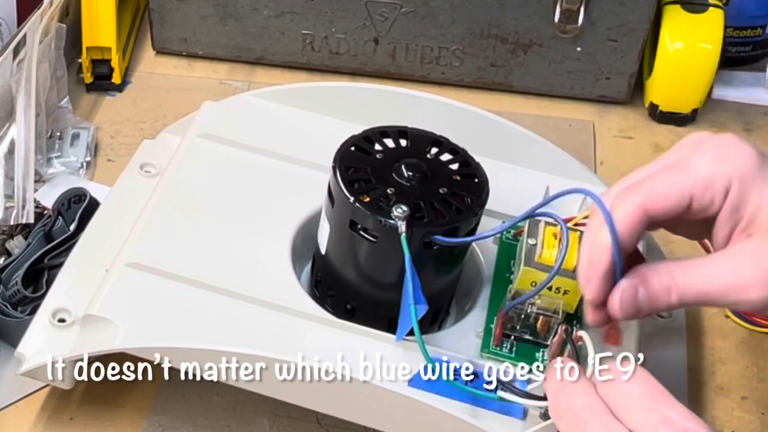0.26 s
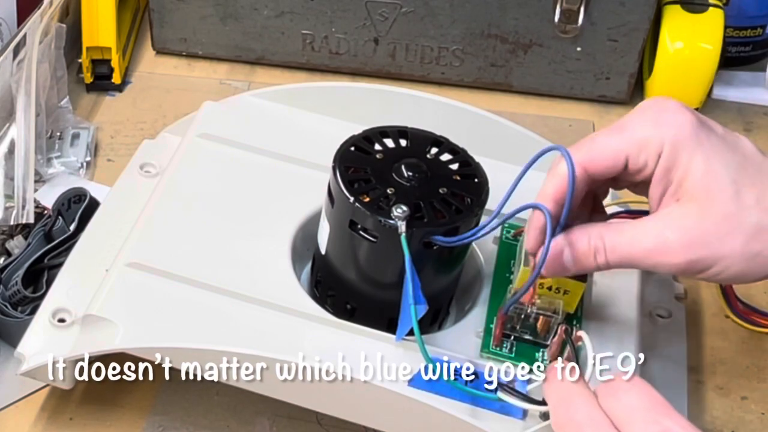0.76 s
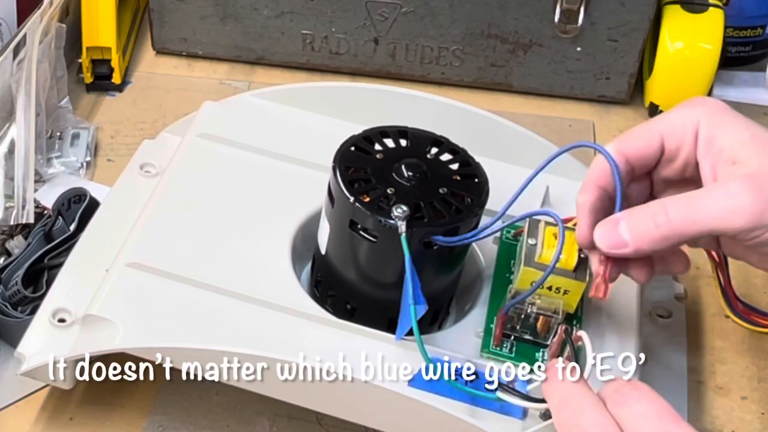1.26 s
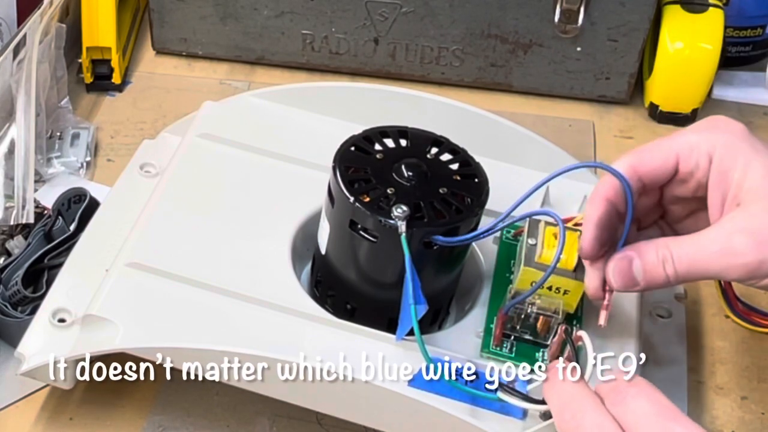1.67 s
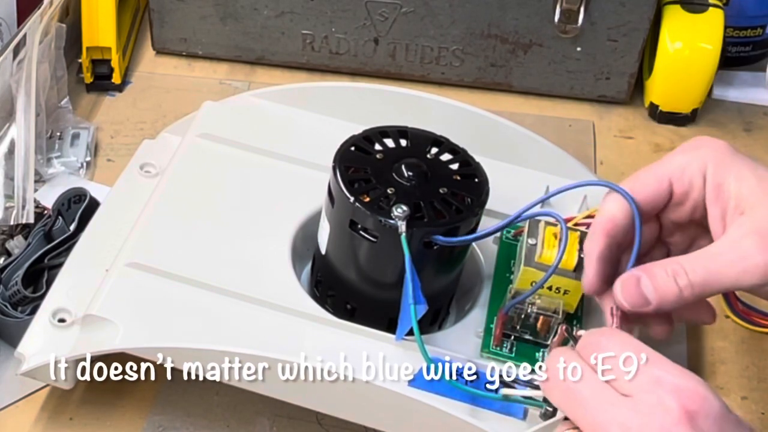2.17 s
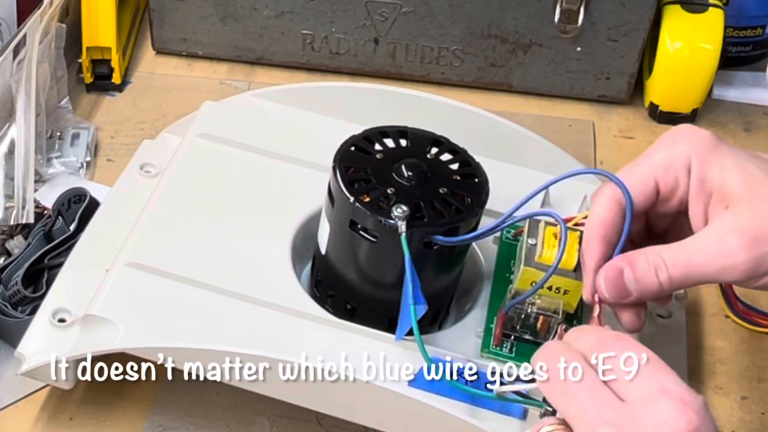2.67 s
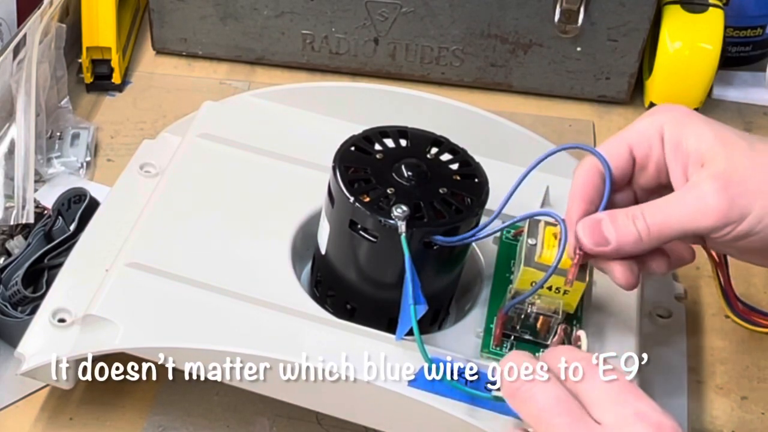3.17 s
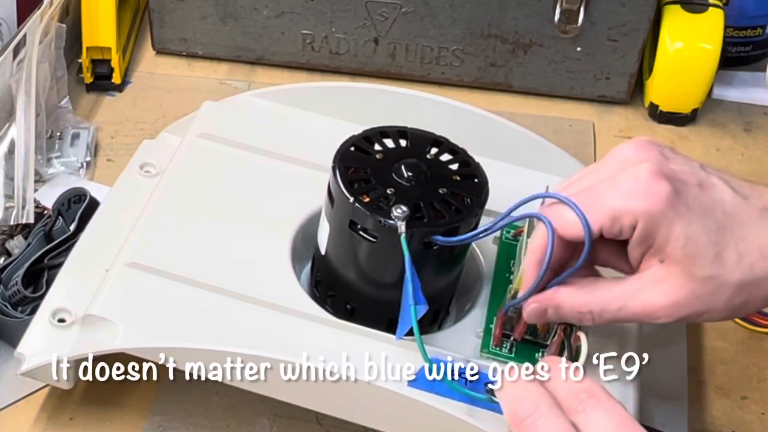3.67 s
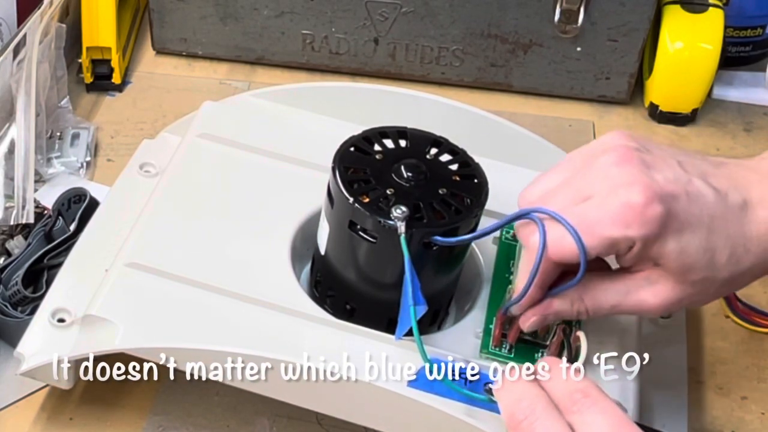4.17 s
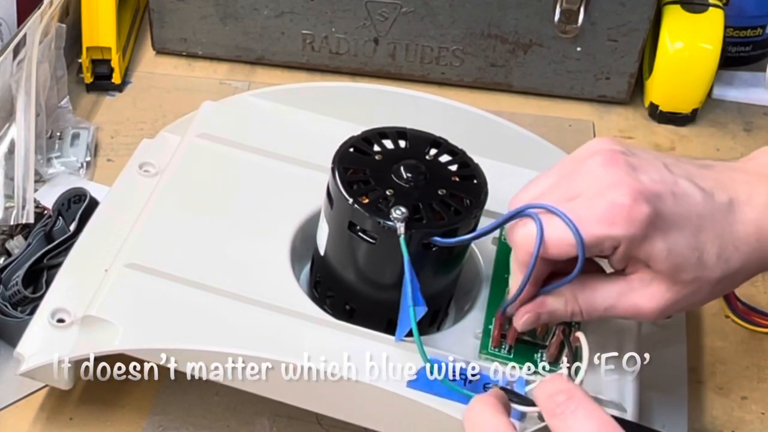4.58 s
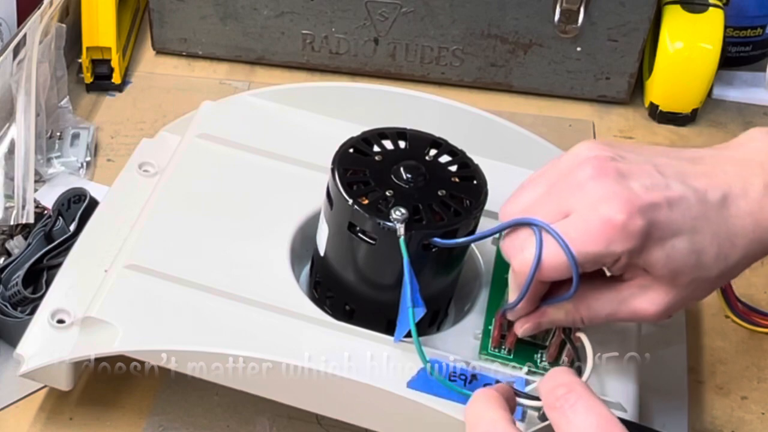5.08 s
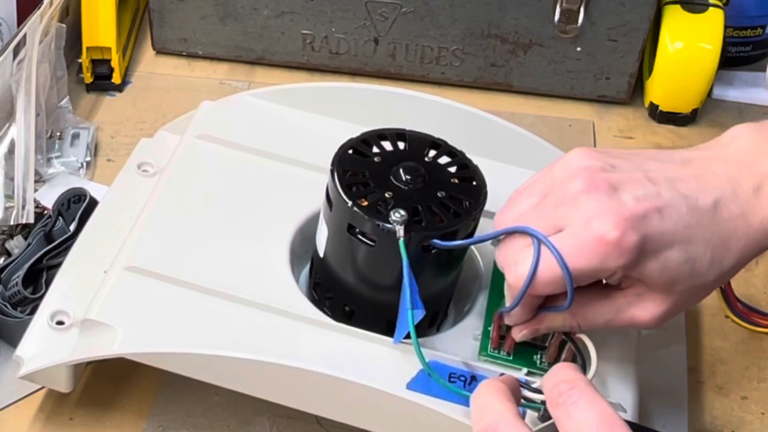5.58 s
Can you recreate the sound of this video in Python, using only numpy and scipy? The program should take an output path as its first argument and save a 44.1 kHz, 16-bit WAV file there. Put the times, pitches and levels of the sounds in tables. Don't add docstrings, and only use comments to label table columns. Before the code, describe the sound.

Close, dry clicks and short rubs of fingers fitting wire connectors to a circuit board on a hollow plastic housing. A burst in the first second, a nearly quiet middle, then busier pushing with firm knocks and a sharp final snap. Low ventilation hum throughout; stereo phone about half a metre away in a small workshop.

```python
import sys
import numpy as np
from scipy import signal
from scipy.fft import rfft, irfft
from scipy.io import wavfile
from scipy.ndimage import uniform_filter1d

SR = 44100
rng = np.random.default_rng(int(sys.argv[2]) if len(sys.argv) > 2 else 0)


def elevation(decibels):
    levels = np.asarray(decibels, float)
    return 10 ** (levels / 20)


def transcribe(signal):
    frames = np.atleast_2d(signal).T
    limited = np.clip(frames, -1, 1)
    pcm = np.round(limited * 32767).astype(np.int16)
    wavfile.write(sys.argv[1], SR, pcm)


N = 257103

# pitch_hz, density_db (per Hz)
ROOM_SPECTRUM = [(18, -49), (30, -12.5), (50, -3), (108, 0.5), (177, -14.5), (400, -19), (600, -26.5),
                 (1300, -37.5), (3700, -48), (6300, -39), (8800, -45.5), (10100, -36), (11400, -45.5),
                 (12600, -57)]
# pitch_hz, width_hz, level_db (rms)
FAN_TONES = [(435, 8.9, -70.5), (714, 11, -82.5), (1020, 45, -81.5), (2038, 14.5, -88.5), (5426, 48, -92),
             (6500, 300, -84)]
QUIET_DB = [-79, -81, -77, -87, -76]
# pitch_hz, near_likeness (0-1), room_likeness (0-1), lead_rad, left_minus_right_db
PORTS = [(0, 1, 1, 0, 1), (130, .97, .9, 0, 3.5), (300, .7, .25, -.4, -2), (700, .9, .3, -1.1, 1),
         (1600, .6, .3, -1.9, 2), (2300, .6, .3, -2.8, 1), (3400, .7, .25, -1.3, 5), (4300, .7, .3, 0, 1),
         (5800, .6, .2, 2.8, 4), (6800, .6, .25, 4, -1), (8300, .6, .2, 6, 0), (8750, .98, .65, 6.3, 1),
         (10250, .93, .95, 9.42, 0), (11700, .99, .98, 12.57, 1), (13000, .98, .95, 15, 1)]

# pitch_hz, level_db, t60_s
HOUSING_MODES = [(582.5, 2, 0.071), (605, -3.5, 0.061), (548, -27.5, 0.061), (417, -7.5, 0.04)]
RIM_MODES = [(759.4, 0, 0.11), (720, -2, 0.14), (841, -6.5, 0.058), (992, -0.5, 0.065), (1065, -6.5, 0.035),
             (1083, -5, 0.047)]
BOARD_MODES = [(1310, -2.5, 0.062), (1501, -11.5, 0.041), (1783, -1.5, 0.06), (1897, 1, 0.054),
               (2234, -8.5, 0.027)]
PARTS_MODES = [(2662, 2, 0.033), (2957, -1, 0.034), (3270, 1, 0.037), (3593, -3, 0.036),
               (3973, -8.5, 0.028), (4570, -5, 0.026)]
TAB_MODES = [(5460, 0, 0.022), (6100, 4, 0.025), (6560, 0, 0.034), (7260, -25, 0.018), (8240, -3.5, 0.02),
             (9080, -1.5, 0.012), (10130, 10.5, 0.011), (11040, 5.5, 0.014), (12500, -19, 0.014)]
# pitch_hz, level_db
BENCH_MODES = [(55, -14), (108, -1), (196, -12.5)]

# start_s, pitch_hz, level_db
SQUEAK = [
    (4.34, 6100, -95),
    (4.4, 6300, -71),
    (4.5, 6600, -78),
    (4.62, 6950, -78),
    (4.65, 6500, -95),
]
# start_s, length_s, housing_pressure_db, skin_hiss_over_it_db
SLIDES = [(.26, .08, -77, -7), (0.338, 0.087, -64.5, -19), (0.408, 0.099, -60, -15),
          (0.537, 0.063, -53, -36), (.628, 0.18, -74, -17), (1.63, 0.22, -80.5, -2.5), (1.767, .1, -83, 0),
          (2.618, .092, -67, -17), (2.802, 0.087, -93.5, 14), (2.907, 0.11, -62, -17.5),
          (3.01, 0.12, -70.5, -9), (0.993, 0.13, -88, -1), (3.426, 0.09, -74, -13),
          (3.472, .16, -63.5, -15), (3.624, 0.053, -54, -18.5), (3.701, 0.04, -54, -14),
          (3.97, 0.082, -63, -19.5), (4.148, 0.098, -61, -15), (4.27, 0.061, -68.5, 5.5),
          (4.336, 0.097, -64, -15), (4.444, 0.14, -66.5, -17.5), (4.625, 0.042, -72, 7.5),
          (4.707, .076, -60, -24), (4.802, 0.091, -73.5, -16), (4.957, 0.069, -66.5, -33),
          (5.225, 0.05, -55, -17), (5.338, 0.1, -66.5, -15), (5.471, 0.038, -60.5, -12),
          (5.526, 0.078, -71.5, -10)]
# start_s, length_s, pressure_db
DRAGS = [
    (3.03, 0.13, -76),
    (3.15, 0.3, -75.5),
    (4.38, 0.18, -82.5),
    (5.672, 0.043, -69),
    (5.722, .11, -63),
]
DRAG_DB = [4, -0.5, -0.5, -5, -2.5]
# start_s, pitch_hz, peak_db
RINGS = [(.445, 1070, -47), (.445, 1790, -45), (.535, 1320, -47), (.535, 1880, -49.5), (.537, 762, -41),
         (.54, 8800, -65), (2.215, 1770, -67.5), (2.49, 6100, -61), (.537, 1080, -47), (3.608, 1847, -41),
         (3.63, 192, -49), (4.175, 5200, -56), (4.186, 3800, -53), (4.201, 73.6, -54), (4.291, 199, -45.5),
         (4.294, 5700, -53.5), (4.659, 770, -30.5), (4.659, 1290, -42), (4.659, 1800, -41),
         (4.659, 3640, -43.5), (4.696, 6870, -50.5), (5.213, 1026, -42.5), (5.218, 190, -50.5),
         (5.269, 1050, -56), (5.496, 588, -34.5), (5.509, 8950, -29), (5.509, 9970, -26),
         (5.508, 11630, -24.5), (5.51, 1833, -34)]
# start_s, level_db
THUMPS = [
    (3.612, -38.5),
    (4.664, -29.5),
    (4.697, -34),
    (5.506, -32),
]
# start_s, board_db, housing_over_board_db, tab_over_board_db
PUSHES = [(.421, -45.5, -15, -29), (.4445, -37, -32, -14), (.4693, -48.5, -3, -13),
          (.5339, -41, -10.5, -12), (.5842, -58.5, 11, -16), (2.4846, -72.5, 0, 23.5),
          (2.9582, -49.5, -4.5, -7.5), (3.4122, -54, -1, -28), (3.6073, -35, -2.5, -16.5),
          (3.6566, -38, -9, -9.5), (3.7073, -53.5, 6.5, -2), (3.7153, -56, 8, 2), (3.7288, -54.5, -1, 2),
          (3.7444, -60, 12.5, -8), (4.1744, -49.5, -16, -18), (4.1844, -39, -12.5, -22.5),
          (4.2804, -54.5, -12, 3.5), (4.2934, -51.5, -20, 1.5), (4.6514, -42, -2, -7),
          (4.6573, -35, -3, -12), (4.6962, -43.5, -2, -9), (4.8195, -51, -7, -10.5),
          (5.2145, -35.5, -6.5, -11), (5.2676, -44, -1.5, -12.5), (5.465, -63, 4.5, 8),
          (5.4934, -47, -15, -10), (5.4982, -36, 4.5, -6), (5.5021, -39, -3.5, -5),
          (5.5086, -31.5, -6.5, 1), (5.5174, -43, -4, -7)]
# start_s, board_db
BOARD_TAPS = [
    (.0934, -53.5),
    (.298, -52),
    (.78, -64),
    (1.0296, -63),
    (3.9754, -69),
    (4.3735, -54),
    (5.678, -58),
]
# start_s, board_db
HOUSING_TAPS = [(.4844, -61), (2.2144, -71.5), (2.6324, -69), (2.9098, -64), (2.9174, -63), (3.0823, -60.5),
                (3.4057, -58), (3.4949, -61), (3.5364, -57), (4.543, -62), (4.616, -63), (4.7391, -58),
                (4.9122, -67), (5.151, -65), (5.3295, -61.5), (5.3845, -59.5), (5.4276, -65)]
# start_s, board_db
TAB_TAPS = [
    (.3242, -77),
    (.7394, -76.5),
    (1.8194, -76),
    (2.8444, -77),
    (4.3194, -63.5),
    (4.8474, -66),
    (5.352, -73.5),
]


def above(db, quiet_db):
    return np.sqrt(np.maximum(elevation(db) ** 2 - elevation(quiet_db) ** 2, 1e-12))


def unit(x):
    return x / np.sqrt(np.mean(x ** 2))


def walk(rate_hz):
    hold = int(SR / rate_hz)
    steps = np.repeat(rng.standard_normal(N // hold + 1), hold)
    return 1.55 * uniform_filter1d(uniform_filter1d(steps, hold), hold)[:N]


def band(x, lo_hz, hi_hz):
    return signal.sosfilt(signal.butter(2, [lo_hz, hi_hz], "bandpass", fs=SR, output="sos"), x)


def workshop():
    f = np.maximum(np.arange(N // 2 + 1) * SR / N, 1)
    hz, db = np.transpose(ROOM_SPECTRUM)
    colour = elevation(np.interp(np.log(f), np.log(hz), db))
    air = irfft(rfft(rng.standard_normal(N)) * colour, N)
    out = unit(air) * elevation(-53.5 + 0.43 * walk(3.0))
    for hz, width_hz, db in FAN_TONES:
        tone = unit(band(rng.standard_normal(N), hz - width_hz / 2, hz + width_hz / 2))
        out = out + elevation(db + 1.4 * walk(2.48)) * tone
    return out


def squeak():
    s, hz, db = np.transpose(SQUEAK)
    t = np.arange(N) / SR
    pitch_hz = np.interp(t, s, hz) * (1 + .016 * walk(90))
    phase = 2 * np.pi * np.cumsum(pitch_hz) / SR
    return elevation(np.interp(t, s, db, -140, -140) + 3.5 * walk(50)) * np.sin(phase)


def rings():
    out = np.zeros(N + SR)
    t = np.arange(SR // 2) / SR
    thumps = [(s, hz, db + mode_db) for s, db in THUMPS for hz, mode_db in BENCH_MODES]
    for s, hz, db in RINGS + thumps:
        rise_s = 0.71 / hz + 0.00019
        t60_s = 0.26 * (100 / hz) ** 0.48
        shape = (1 - np.exp(-(t / rise_s) ** 2)) * np.exp(-np.log(1000) * t / t60_s)
        start = int(s * SR)
        out[start:start + len(t)] += elevation(db) * shape / shape.max() * np.sin(2 * np.pi * hz * t)
    return out[:N]


def grit(over_db, hiss_share, drag_db, rough_db, patchy_db):
    power = np.zeros(N)
    slides = [(s, length, db + over_db + hiss_share * hiss_db) for s, length, db, hiss_db in SLIDES]
    drags = [(s, length, db + drag_db) for s, length, db in DRAGS]
    for s, length, db in slides + drags:
        power[int(s * SR):int((s + length) * SR)] += elevation(db) ** 2
    level = np.sqrt(np.maximum(signal.lfilter([.003], [1, -.997], power), 0))
    grains = rng.standard_normal(N) * elevation(rough_db * rng.exponential(size=N))
    return level * unit(grains * elevation(patchy_db * walk(40)))


def contacts():
    kinds = (BOARD_TAPS, (-14, -13.5)), (HOUSING_TAPS, (3.5, -13)), (TAB_TAPS, (5.5, 8.5))
    return list(PUSHES) + [(*row, *stirred) for taps, stirred in kinds for row in taps]


def blows(gains, push_s, crackle_db, steady=False):
    t = np.arange(1024) / SR
    force = np.zeros(N + len(t))
    chance = rng.standard_normal((len(gains), 2, len(t)))
    for row, gain, (noise, size) in zip(contacts(), gains, chance):
        burst = noise * elevation(crackle_db * size) * np.exp(-t / push_s)
        if steady:
            burst = abs(burst) * np.sign(noise[0]) / np.sum(abs(burst))
        else:
            burst = burst / np.sqrt(np.sum(burst ** 2))
        start = int(row[0] * SR)
        force[start:start + len(t)] += gain * burst
    return force[:N]


def body(modes, rattle_db, rattle_t60, walls_db, walls_t60=0.21, rise_s=0.0013):
    t = np.arange(SR // 2) / SR

    def fade(t60):
        return np.exp(-np.log(1000) * t / max(t60, .003))

    ring = sum(elevation(db) * np.sin(2 * np.pi * hz * t) * fade(t60) * rng.choice([-1, 1])
               for hz, db, t60 in modes)
    lowest_hz, highest_hz = min(m[0] for m in modes), max(m[0] for m in modes)
    dense = unit(band(rng.standard_normal(len(t)), 0.7 * lowest_hz, 1.19 * highest_hz))
    ring = ring + dense * (elevation(rattle_db) * fade(rattle_t60) + elevation(walls_db) * fade(walls_t60))
    ring = band(ring * (1 - np.exp(-t / rise_s)), 0.73 * lowest_hz, 1.144 * highest_hz)
    return ring / np.sqrt(np.sum(ring ** 2))


def handling():
    _, board_db, hollow_db, metal_db = np.transpose(contacts())
    rim_db = board_db + hollow_db / 2 - 3.5
    parts_db = board_db + metal_db / 2 - 4
    strengths_db = board_db + hollow_db, rim_db, board_db, parts_db, board_db + metal_db
    housing, rim, board, parts, tab = [above(db, quiet) for db, quiet in zip(strengths_db, QUIET_DB)]
    drag = DRAG_DB

    housing_force = elevation(28) * blows(housing, .0001, 3, steady=True)
    housing_force += grit(-2, 0, drag[0], rough_db=3.5, patchy_db=2.2)
    rim_force = elevation(27.5) * blows(rim, .0001, 3, steady=True)
    rim_force += grit(-3, 0, drag[1], rough_db=3, patchy_db=2.5)
    board_force = elevation(21.5) * blows(board, .00005, 2.7, steady=True)
    board_force += elevation(5.0) * grit(-3, 0.47, drag[2], rough_db=3.0, patchy_db=3.5)
    parts_force = elevation(24.0) * blows(parts, 0.00078, 4.6)
    parts_force += elevation(0.7) * grit(-3.5, 0.61, drag[3], rough_db=2.5, patchy_db=3.0)
    tab_force = elevation(25.5) * blows(tab, 0.00084, 3.8)
    tab_force += grit(4.8, 0.96, drag[4], rough_db=3.0, patchy_db=-0.5)

    pairs = [(housing_force, body(HOUSING_MODES, -12.0, 0.052, -23.5, 0.36, 0.0039)),
             (rim_force, body(RIM_MODES, -5.5, 0.15, -20.0, 0.19, 0.0029)),
             (board_force, body(BOARD_MODES, -2.2, 0.093, -15, 0.23, 0.00095)),
             (parts_force, body(PARTS_MODES, -1.3, 0.067, -17.5)),
             (tab_force, body(TAB_MODES, 3.7, 0.028, -5.5, .15, 0.00024))]
    return sum(signal.fftconvolve(force, response)[:N] for force, response in pairs)


def ports(left, other, column):
    f, table = np.arange(N // 2 + 1) * SR / N, np.transpose(PORTS)
    like, lead, lean_db = (np.interp(f, table[0], table[k]) for k in (column, 3, 4))
    like = np.clip(like, 0, 1)
    right = like * rfft(left) * np.exp(1j * lead) + np.sqrt(1 - like ** 2) * rfft(other)
    return np.array([irfft(rfft(left) * elevation(lean_db / 2), N), irfft(right * elevation(-lean_db / 2), N)])


def scene():
    alone = rings() + squeak()
    near = ports(handling() + alone, handling() + alone, column=1)
    return near + ports(workshop(), workshop(), column=2)


def gate_treble(x):
    gate_hz, floor_db, mask_db = 9650, -104, -13
    f, _, z = signal.stft(np.array([x[0] + x[1], x[0] - x[1]]) / 2, SR, nperseg=1024)
    power = uniform_filter1d(abs(z) ** 2, size=3, axis=2)
    first = int(np.searchsorted(f, gate_hz))
    masked = elevation(mask_db) ** 2 * np.mean(power[:, first - 40:first + 50], axis=(0, 1))
    for k in range(first, len(f), 8):
        sway_db = 7 * uniform_filter1d(rng.standard_normal((2, z.shape[2])), size=4, axis=1)
        need = np.maximum(masked, elevation(floor_db) ** 2) * elevation(sway_db) ** 2
        z[:, k:k + 8] *= (np.mean(power[:, k:k + 8], axis=1) > need)[:, None]
    mid, side = signal.istft(z, SR, nperseg=1024)[1][:, :N]
    return np.array([mid + side, mid - side])


def top_cut(x):
    return signal.sosfilt(signal.butter(12, 12990, fs=SR, output="sos"), x)


def record(dry):
    soft = signal.sosfilt(signal.butter(7, 12100, fs=SR, output="sos"), dry)
    return top_cut(gate_treble(soft))


dry = scene()
out = record(dry)
transcribe(out)
```